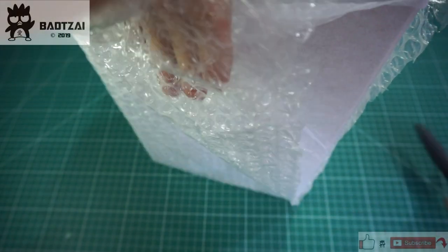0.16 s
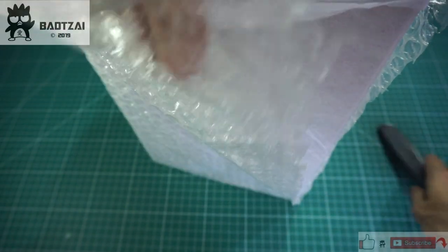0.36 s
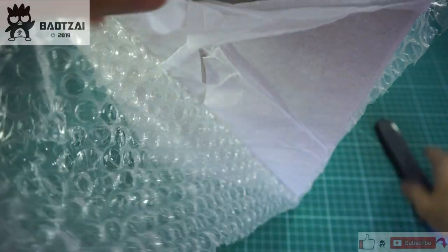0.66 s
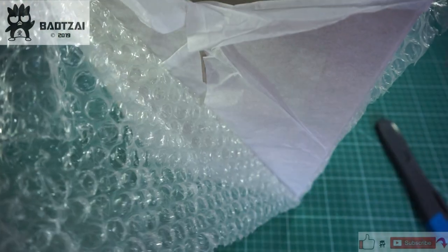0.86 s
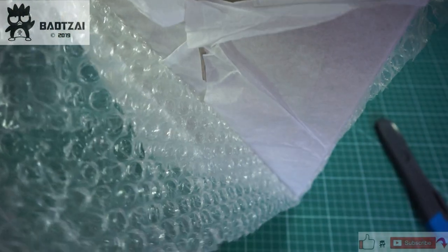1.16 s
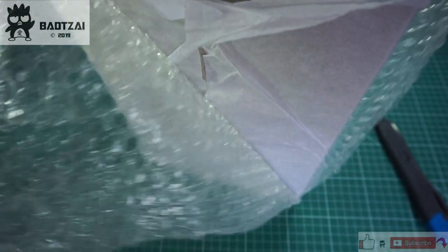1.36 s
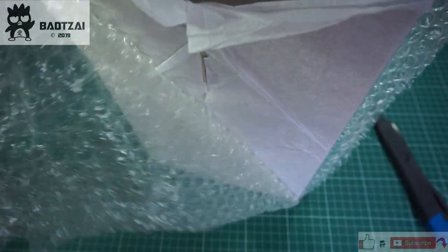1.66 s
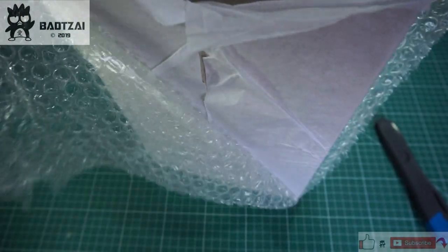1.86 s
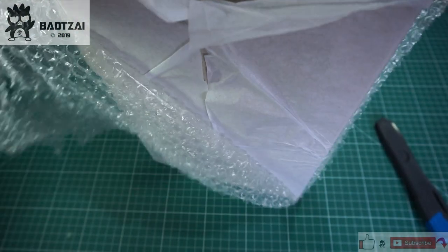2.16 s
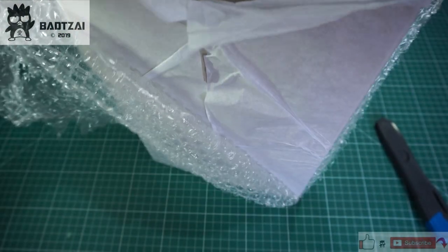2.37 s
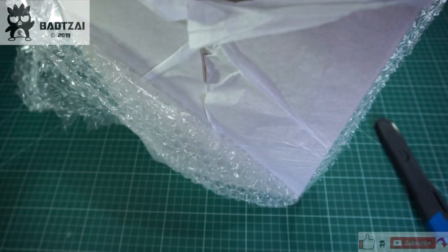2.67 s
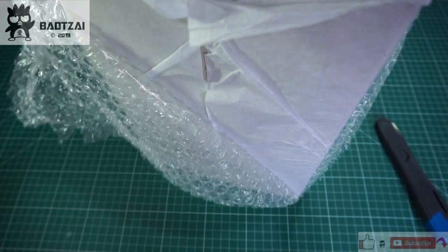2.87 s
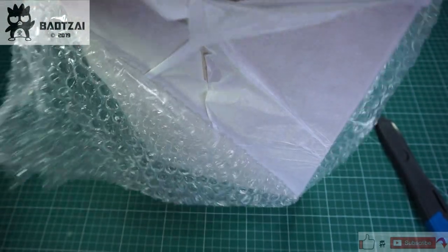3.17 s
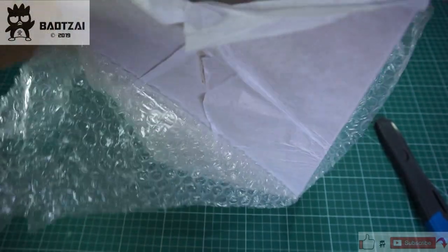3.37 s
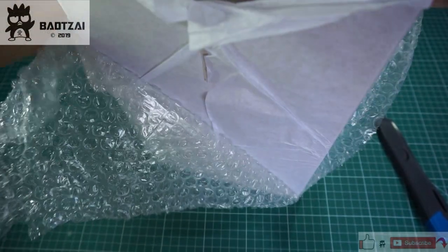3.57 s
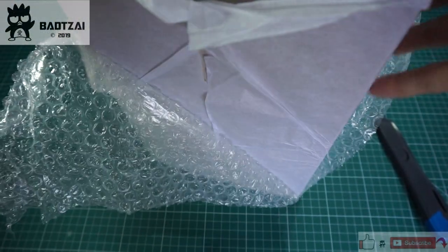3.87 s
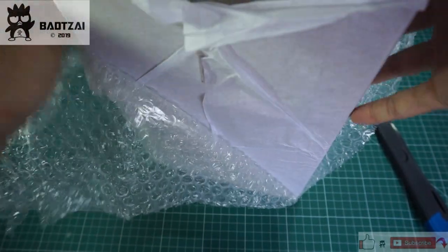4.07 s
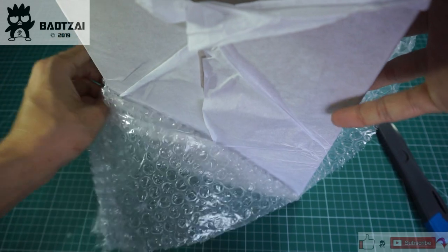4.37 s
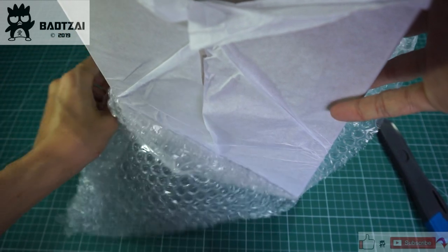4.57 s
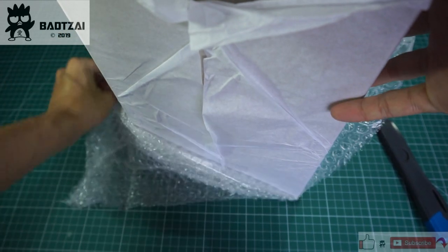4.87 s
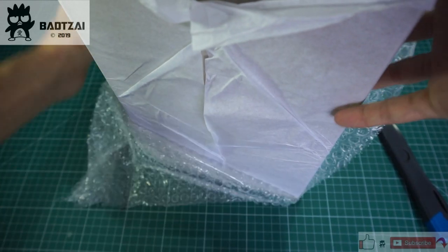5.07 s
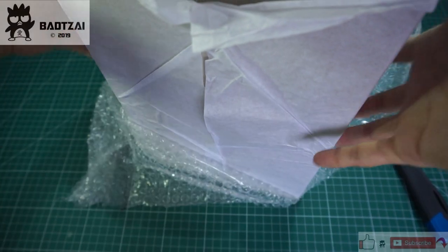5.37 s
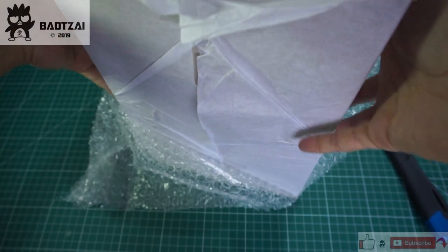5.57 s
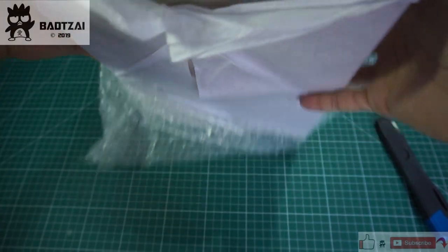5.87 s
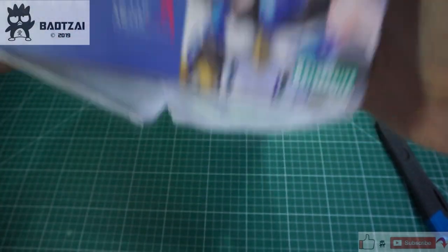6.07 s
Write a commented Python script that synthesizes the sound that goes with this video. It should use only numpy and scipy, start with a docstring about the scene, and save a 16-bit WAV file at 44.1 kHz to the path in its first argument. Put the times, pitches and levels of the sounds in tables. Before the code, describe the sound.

Close to a stereo microphone in a small room, hands pull bubble wrap off a paper-covered cardboard box. Soft rustling and the short clacks of a craft knife being put down give way to bright, surging crackle dotted with snapping air cells. The plastic settles briefly, then crumples again toward the left. Near the end the box knocks and slides with a low rumble, over a faint fan hum.

```python
"""Bubble wrap crinkles as it is pulled off a paper-covered cardboard box, close to a small stereo microphone.
The bent film releases elastic energy in waves of tiny clicks; creases tick and air cells buckle with
hollow snaps. Early on, a craft knife is put down on the mat and rings in damped modes. The box is
knocked and dragged on the desk, and a fan hums in the small room."""
import sys
import numpy as np
from scipy import signal
from scipy.fft import rfft, irfft, next_fast_len
from scipy.io import wavfile

SR = 44100
rng = np.random.default_rng(int(sys.argv[2]) if len(sys.argv) > 2 else 0)


def to_wav(sig):
    """Store sig (one row per channel, or 1-D mono) as 16-bit WAV at the path in sys.argv[1].

    Samples outside -1..1 are clipped; the rate is SR.
    """
    pcm = np.clip(np.atleast_2d(sig), -1, 1) * 32767
    pcm = np.round(pcm).astype(np.int16)
    wavfile.write(sys.argv[1], SR, pcm.T)  # frames by channels


N = 274743

# Buckling air cells. Each row: time in seconds, relative peak in dB, pitch in Hz, left minus right in dB.
CELL_SNAPS = [(1.3389, -16, 2670, -2.0), (1.3763, -11, 2860, -1.0), (1.4371, -14, 4000, 1.0),
              (1.5354, -18, 3140, -4.0), (1.7619, -18, 2610, 1.5), (2.1505, -18, 2130, -1.0),
              (2.2223, -24, 4300, 2.0), (2.6209, -17, 2630, 3.0), (2.6823, -13, 1870, 2.0),
              (2.8464, -19, 2780, 2.5), (3.275, -10, 2400, 4.5), (4.6239, -10, 3350, 2.5),
              (5.1901, -33, 2010, 3.5)]


def from_db(db):
    """Amplitude ratio of a level in decibels."""
    return 10 ** (np.asarray(db) / 20)


def rms_one(x):
    """Normalisation to unit rms."""
    return x / np.sqrt(np.mean(x ** 2) + 1e-20)


def peak_at(x, db):
    """Normalisation to a peak level."""
    return from_db(db) * x / np.abs(x).max()


def in_time(rows):
    """Linear interpolation of each column of a time curve at every sample."""
    times, *columns = np.transpose(rows)
    return [np.interp(np.arange(N) / SR, times, column) for column in columns]


def at_hz(points, hz):
    """Interpolation on a logarithmic frequency axis."""
    freqs, values = np.transpose(points)
    return np.interp(np.log(hz), np.log(freqs), values)


def bands(spectrum):
    """Filter bank: centre, gain and band-pass of each band that a spectrum covers."""
    edges_hz = np.r_[np.geomspace(28, 2000, 12)[:-1], np.geomspace(2000, 17000, 11)]
    for low, high in zip(edges_hz, edges_hz[1:]):
        if high > spectrum[0][0] and low < spectrum[-1][0]:
            hz = np.sqrt(low * high)
            sos = signal.butter(2, [low, high], "band", fs=SR, output="sos")
            yield hz, from_db(at_hz(spectrum, hz)), sos


def drift(corner_hz):
    """Slow random modulation: low-passed noise of unit rms."""
    step, settling = 40, 2000
    r = np.exp(-2 * np.pi * corner_hz * step / SR)
    white = rng.standard_normal(N // step + settling + 2)
    slow = signal.lfilter([1], [1, -2 * r, r * r], white)[settling:]
    return np.interp(np.arange(N) / step, np.arange(len(slow)), rms_one(slow))


def stroke(start, length, rise_s, release_s):
    """Envelope of a push: linear rise, then exponential decay once its length has passed."""
    t = np.arange(N) / SR - start
    return np.clip(t / rise_s, 0, 1) * np.exp(-np.maximum(t - length, 0) / release_s)


def contact(hz, rattle_db, rattle_s):
    """Impact force: an impulse and a short rattle; a softer contact has a narrower bandwidth."""
    t = np.arange(SR // 4) / SR
    push = (t == 0) + from_db(rattle_db) * rng.standard_normal(len(t)) * np.exp(-t / rattle_s)
    return signal.sosfilt(signal.butter(2, min(hz, .45 * SR), fs=SR, output="sos"), push + 1e-18)


def ring(x, hz, t60):
    """Damped resonator: one mode driven by x, falling 60 dB in t60 seconds."""
    r = np.exp(-np.log(1000) / (t60 * SR))
    angle = 2 * np.pi * min(hz / SR, .45)
    return signal.lfilter([.5, 0, -.5], [1, -2 * r * np.cos(angle), r * r], x + 1e-18)


def ports(x, pan_db):
    """Path difference: sound from one side reaches the far microphone port later and weaker."""
    size = next_fast_len(len(x) + 64)
    lag_s = 3.9e-5 * min(abs(pan_db) / 6, 1)
    delay = np.exp(-2j * np.pi * np.fft.rfftfreq(size, 1 / SR) * lag_s)
    late = irfft(rfft(x, size) * delay, size)[:len(x)]
    balance = rms_one(from_db([[pan_db / 2], [-pan_db / 2]]))
    return np.array([x, late] if pan_db > 0 else [late, x]) * balance


def diffuse(pair, hz):
    """Diffuse-field coherence: two independent signals become left and right, alike in the bass."""
    # Each row: frequency in Hz, correlation between the ports from -1 to 1.
    coherence = [(60, 0.99), (300, 0.98), (640, 0.36), (1400, 0.35), (3100, -0.26), (6800, 0.42),
                 (11000, 1), (16000, -0.85)]
    alike = np.clip(at_hz(coherence, hz), -1, 1)
    return np.sqrt((1 + alike) / 2) * pair[0] + np.sqrt((1 - alike) / 2) * pair[1] * [[1], [-1]]


def noise(spectrum):
    """Diffuse stereo noise of unit rms, shaped band by band."""
    white = rng.standard_normal((2, 2, N))
    return rms_one(sum(gain * diffuse(signal.sosfilt(sos, white[k % 2]), hz)
                       for k, (hz, gain, sos) in enumerate(bands(spectrum))))


def add(out, s, sound):
    """Superposition of a short sound at s seconds."""
    at = max(round(s * SR), 0)
    out[:, at:at + sound.shape[1]] += sound[:, :N - at]


def grains(spectrum, per_s, spread_db, clump_db, colour_db):
    """Crackling noise: tiny slips come in avalanches, each slip with its own size and colour."""
    at = np.flatnonzero(rng.random(N) < per_s * from_db(clump_db * drift(45)) / SR)
    size_db = spread_db * np.minimum(rng.exponential(1, len(at)), 5)
    out = np.zeros(N)
    for hz, gain, sos in bands(spectrum):
        band_db = size_db + colour_db * rng.uniform(-0.33, 1, len(at))
        clicks = np.full(N, 1e-18)
        clicks[at] = from_db(band_db) * rng.choice([-1, 1], len(at))
        out += gain * signal.sosfilt(sos, clicks)
    return rms_one(out)


def sheet(spectrum, width_db, pan_db=0, **texture):
    """Extended source: independent crackle on the left and on the right shares a constant power."""
    left, right = (ports(grains(spectrum, **texture), side * width_db) for side in (1, -1))
    share = 1 / (1 + from_db(-2 * pan_db))
    return np.sqrt(share) * left + np.sqrt(1 - share) * right


def handling():
    """Driving force: how hard the hands work the film, and on which side, through four moves."""
    # Each row: time in seconds, effort in dB, lean (positive to the left).
    lift = [(0.12, -39.5, 3), (0.212, -39.5, 2), (0.728, -39.5, 3), (0.882, -62, 5), (0.896, -49.5, 4),
            (1.024, -49, 3), (1.1, -42, 6), (1.11, -55, 6)]
    peel = [(1.12, -46, 6), (1.13, -37.5, 0.5), (1.24, -30, -0.5), (1.37, -28.5, -2), (1.38, -25.5, 0),
            (1.48, -33, 2), (1.52, -26.5, -1), (1.59, -32.5, -1.5), (1.84, -30.5, 2.5), (1.89, -30.5, -1.5),
            (2.05, -30.5, 1), (2.1, -33.5, 0), (2.17, -30, 0), (2.19, -40, -0.5), (2.23, -29, 1.5),
            (2.41, -29.5, 3.5), (2.45, -39.5, 0.5), (2.58, -29, 1.5), (2.94, -33.5, 2.5), (3.28, -28, -0.5),
            (3.6, -38, 0.5), (3.8, -59, 3)]
    tug = [(3.85, -52.5, 0), (3.996, -51, 0), (4.074, -39, 3), (4.202, -29.5, 4.5), (4.758, -29, 3),
           (4.894, -30.5, 4), (4.924, -36.5, 5), (4.996, -33.5, 3.5), (5.138, -53.5, 0), (5.15, -57, -1),
           (5.178, -46, 3), (5.27, -49, -2)]
    shove = [(5.29, -55, -3), (5.304, -37.5, -2.5), (5.406, -39.5, -2), (5.532, -30.5, 8), (5.572, -37, 2),
             (5.96, -41.5, 3.5), (6.116, -38, -2), (6.198, -37.5, 2), (6.23, -48, 3)]
    return in_time(sorted(lift + peel + tug + shove))


def stick_slip(effort):
    """Stick-slip: the film catches and lets go in surges; whole folds follow with a first-order lag."""
    surge_db, fold_lag_s = 1.27, 0.059
    surge = from_db(surge_db * drift(corner_hz=5))
    pole = np.exp(-1 / (fold_lag_s * SR))
    return surge * effort, surge * signal.lfilter([1 - pole], [1, -pole], effort)


def film_crinkle(strain, lean):
    """Elastic release: the strained film sheds a dense stream of bright clicks."""
    # Each row: frequency in Hz, relative spectral density in dB.
    spectrum = [(900, -20), (2000, -9), (4000, -3.5), (7000, -2.5), (10000, 0), (12500, 0), (15500, .5)]
    crackle = sheet(spectrum, width_db=15, pan_db=1.5 * lean,
                    per_s=3800, spread_db=3.3, clump_db=3.5, colour_db=6)
    return from_db(5) * strain * crackle


def fold_crumple(bending, pushed, lean):
    """Crumpling: whole folds give way with a deeper crackle; bending and pushing add in power."""
    # Each row: frequency in Hz, relative spectral density in dB.
    spectrum = [(600, -26), (1200, -5), (2300, 1), (3300, -0.5), (5000, -8.5), (8000, -9.5)]
    crushing = np.hypot(from_db(-7.5) * bending, from_db(2) * pushed)
    return crushing * sheet(spectrum, width_db=2.5, pan_db=4.4 * lean,
                            per_s=1400, spread_db=2, clump_db=2.5, colour_db=18)


def box_rubbing(bending, pushed):
    """Sliding friction: the wrap rubs on the box in small, low-pitched slips."""
    # Each row: frequency in Hz, relative spectral density in dB.
    spectrum = [(250, -13.5), (480, -4.5), (740, 1), (1100, -4.5), (2000, -2.5)]
    drive = from_db(-2) * np.hypot(from_db(-15) * bending, pushed)
    return drive * sheet(spectrum, width_db=3, per_s=800, spread_db=3, clump_db=2, colour_db=15.5)


def finger_slides():
    """Skin friction: fingers slide off the taut film in slips so dense that they merge into a hiss."""
    # Each row: start, length, rise and release in seconds, relative level in dB.
    slides = [(0.0, 0.086, 0.0017, .055, -31), (5.435, 0.11, 0.055, .012, -35)]
    # Each row: frequency in Hz, relative spectral density in dB.
    spectrum = [(1500, -35), (2100, -16), (3000, -6.5), (4800, -1.5), (7500, -19), (9700, -10),
                (11000, -9.5), (13000, -4), (15500, -15)]
    sliding = sum(from_db(db) * stroke(*timing) for *timing, db in slides)
    hiss = sheet(spectrum, width_db=25, per_s=9000, spread_db=2, clump_db=1, colour_db=16)
    return from_db(5) * sliding * hiss


def fan():
    """Narrow-band noise makes wavering fan tones over a broadband rush of air; both swell and sink."""
    # Each row: frequency in Hz, bandwidth in Hz, relative level in dB.
    tones = [(312, 10, 0), (416, 14, -10), (624, 9, -10)]
    # Each row: frequency in Hz, relative spectral density in dB.
    air = [(30, -23), (60, -12), (120, -7.5), (200, 1), (400, 1.5), (500, -4), (900, -5), (2500, -5),
           (5000, -30.5), (16000, -17)]
    # Each row: time in seconds, relative level in dB.
    swell = [(0.0, -62.5), (0.5, -46.5), (0.95, -51), (1.2, -48), (2.17, -51), (3.38, -46.5), (3.8, -48.5),
             (4.15, -49), (6.23, -46)]
    hum = 0
    for hz, width, db in tones:
        t60 = np.log(1000) / (np.pi * width)
        hum += from_db(db) * rms_one(ring(rng.standard_normal(N), hz, t60))
    return from_db(in_time(swell)[0] - 3.5) * (hum + from_db(4.5) * noise(air))


def stray_creases(effort_db, lean):
    """Poisson process: lesser creases flip at random, following the effort in level and side."""
    per_s, pitch_range_hz = 10, (8100, 13000)
    at = np.flatnonzero(rng.random(N) < per_s / SR)
    for i, (size, pitch, side) in zip(at, rng.uniform(-1, 1, (len(at), 3))):
        db = effort_db[i] + 16 + 2.5 * size
        yield i / SR, db, np.interp(pitch, [-1, 1], pitch_range_hz), lean[i] + 5 * side


def crease_ticks(effort_db, lean):
    """Snap-through: a crease flips with one sharp click, then the film flutters for a moment."""
    # Each row: time in seconds, relative peak in dB, pitch in Hz, left minus right in dB.
    sharpest = [(0.0278, -8, 12400, -2.5), (0.0583, -11, 13000, -2.5), (0.7836, -25, 9140, 0.0),
                (0.841, -25, 10500, 2.5), (0.8984, -23, 15200, 2.5), (0.9054, -24, 13700, 4.0),
                (0.9642, -25, 8720, 3.5), (1.0984, -24, 9860, 4.5), (1.1274, -17, 9420, 1.0),
                (1.4264, -11, 10300, -1.5), (1.8208, -9, 7880, 6.5), (2.1814, -13, 11600, -2.0),
                (2.4004, -13, 8700, 4.0), (3.0674, -14, 5000, 1.5), (3.0844, -9, 6590, 4.0),
                (3.1173, -7, 10800, 4.0), (3.7095, -24, 12100, -3.0), (4.4244, -8, 10900, 5.5),
                (4.8878, -10, 12200, 5.5), (5.1123, -24, 14000, 2.5), (5.1726, -21, 13500, 1.0)]
    out = np.zeros((2, N))
    for s, db, hz, pan_db in sharpest + list(stray_creases(effort_db, lean)):
        flip = contact(15850, rattle_db=-15, rattle_s=0.0006)[:512]
        click = ring(flip, hz, t60=0.0004)
        add(out, s, ports(peak_at(click, db), pan_db))
    return from_db(4) * out


def impacts(blows, modes, rattle_db, rattle_s, pan_db):
    """Modal superposition: each blow rings all the modes of the struck body."""
    out = np.zeros((2, N))
    for s, db, bandwidth_hz in blows:
        push = contact(bandwidth_hz, rattle_db, rattle_s)
        body = sum(from_db(mode_db) * ring(push, hz, t60) for hz, mode_db, t60 in modes)
        add(out, s, ports(peak_at(body, db), pan_db))
    return out


def knife_clacks():
    """Impact excitation: the knife meets the mat and its heavily damped modes clack."""
    # Each row: time in seconds, peak in dB, contact bandwidth in Hz.
    blows = [(0.3737, -10.5, 3400), (0.386, -21.5, 3000), (0.5399, -14.5, 1900), (0.556, -23, 1400),
             (0.6564, -5, 3420)]
    # Each row: frequency in Hz, relative level in dB, t60 in seconds.
    modes = [(242, -26.5, 0.056), (600, -16, 0.014), (756, -23, 0.0093), (1220, -6.5, 0.01),
             (1810, 1, 0.0036), (2790, 2.5, 0.0075), (3180, -15, .005), (4600, -14, 0.0046)]
    return impacts(blows, modes, rattle_db=-18, rattle_s=0.0019, pan_db=-5)


def box_knocks():
    """Box resonance: knocks ring the low modes of the cardboard box."""
    # Each row: time in seconds, peak in dB, contact bandwidth in Hz.
    blows = [(1.141, -33.5, 111), (5.2937, -13.5, 2800), (5.3068, -20, 1300)]
    # Each row: frequency in Hz, relative level in dB, t60 in seconds.
    modes = [(85, -27, 0.078), (203, -31, 0.18), (251, -9, 0.11), (301, 5, 0.047), (352, -6.5, 0.058),
             (552, -3, 0.025), (693, -5, 0.046), (864, -3, 0.028), (1190, -3, 0.014), (1400, -12, 0.037),
             (1920, 5.5, 0.0038), (2660, -4, 0.0053)]
    return impacts(blows, modes, rattle_db=-21.5, rattle_s=0.016, pan_db=1.5)


def cell_snaps():
    """Buckling: an air cell gives way and rings briefly, shaking the larger fold an octave below."""
    out = np.zeros((2, N))
    for s, db, hz, pan_db in CELL_SNAPS:
        push = contact(2 * hz, rattle_db=-10, rattle_s=0.0015)
        pop = ring(push, hz, t60=0.003) + from_db(-7) * ring(push, hz / 2, t60=0.003)
        add(out, s, ports(peak_at(pop, db), pan_db))
    return from_db(2) * out


def flurries():
    """Mechanical coupling: the wrap around a buckling cell is pushed in proportion to the snap."""
    lead_s = 0.016
    return sum(from_db(db - 27.5) * stroke(s - lead_s, length=0.01, rise_s=lead_s, release_s=0.0074)
               for s, db, _, _ in CELL_SNAPS)


def dragging():
    """Friction drives both wrap and desk as the box is dragged: one envelope for each."""
    # Each row: start, length and rise in seconds, relative levels of rubbing and of rumble in dB.
    drags = [(1.484, 0.073, .02, -40.5, -48), (2.758, 0.37, 0.041, -46.5, -52),
             (3.143, 0.14, 0.038, -35.5, -49), (3.333, 0.18, 0.049, -43.5, -49),
             (3.6, 0.31, .05, -60.5, -49.5), (4.123, 0.735, 0.33, -41, -69),
             (5.366, 0.097, 0.12, -33.5, -36.5), (5.98, 0.3, .06, -63, -44)]
    return sum(from_db([[rub_db], [desk_db]]) * stroke(s, length, rise, release_s=0.052)
               for s, length, rise, rub_db, desk_db in drags)


def desk_rumble(drive):
    """Forced vibration: the desk rumbles under the dragged box."""
    # Each row: frequency in Hz, relative spectral density in dB.
    spectrum = [(35, -16), (70, -14), (120, -8), (190, 3.5), (250, 19), (400, -2.5), (600, 16)]
    return from_db(-2) * drive * noise(spectrum)


def room(x, build_s):
    """Reverberation: diffuse reflections build up within milliseconds and die sooner in the treble."""
    # Each row: frequency in Hz, relative reflected level in dB.
    walls = [(150, -5), (600, -.5), (2000, 0), (6000, -1.5), (15000, -4)]
    # Each row: frequency in Hz, reverberation time in seconds.
    decay_times = [(150, 0.32), (1500, 0.22), (5000, 0.23), (15000, 0.081)]
    t = np.arange(SR // 2) / SR
    onset = 1 - np.exp(-(t / build_s) ** 2)
    tail = 0
    for hz, gain, sos in bands(walls):
        shape = onset * np.exp(-np.log(1000) * t / at_hz(decay_times, hz))
        reflections = diffuse(signal.sosfilt(sos, rng.standard_normal((2, len(t)))), hz)
        tail += gain * reflections * shape / np.linalg.norm(shape)
    return signal.fftconvolve(x[None], tail, axes=1)[:, :N]


def scene():
    """Direct and reverberant sound add; the film is close, while knife, box and snaps fill the room more."""
    effort_db, lean = handling()
    strain, bending = stick_slip(from_db(effort_db))
    dragged, desk_drive = dragging()
    pushed = np.hypot(dragged, flurries())
    wrap = film_crinkle(strain, lean) + fold_crumple(bending, pushed, lean)
    wrap += box_rubbing(bending, pushed) + finger_slides() + crease_ticks(effort_db, lean)
    snaps, knife, box = cell_snaps(), knife_clacks(), box_knocks()
    left, right = from_db(-14) * wrap + from_db(-10) * snaps + from_db(-3) * knife + from_db(-7) * box
    reverb = room(left, build_s=0.0097) + room(right, build_s=0.0066)
    return wrap + snaps + knife + box + reverb + desk_rumble(desk_drive) + fan()


def record(dry):
    """Band limiting and overload: the small microphone loses bass, clips rare peaks and cuts the top."""
    bass_hz, top_hz, overload = 130, 15850, 0.8
    thin = signal.sosfilt(signal.butter(2, bass_hz, "high", fs=SR, output="sos"), dry)
    clipped = np.clip(thin, -overload, overload)
    return signal.sosfilt(signal.ellip(16, .1, 80, top_hz, fs=SR, output="sos"), clipped)


dry = scene()
out = record(dry)
to_wav(out)
```